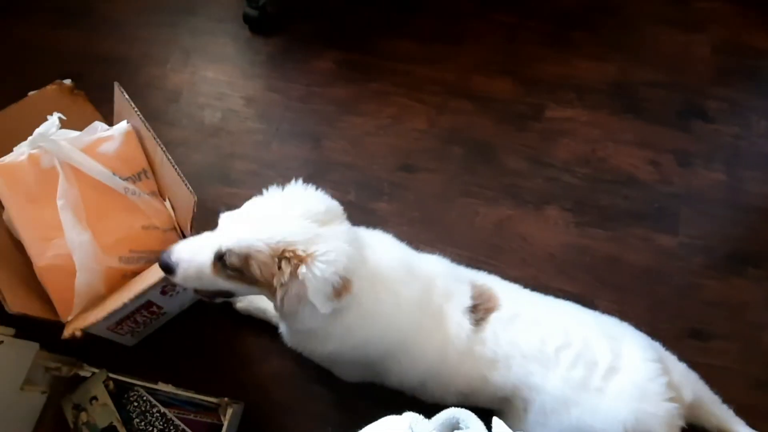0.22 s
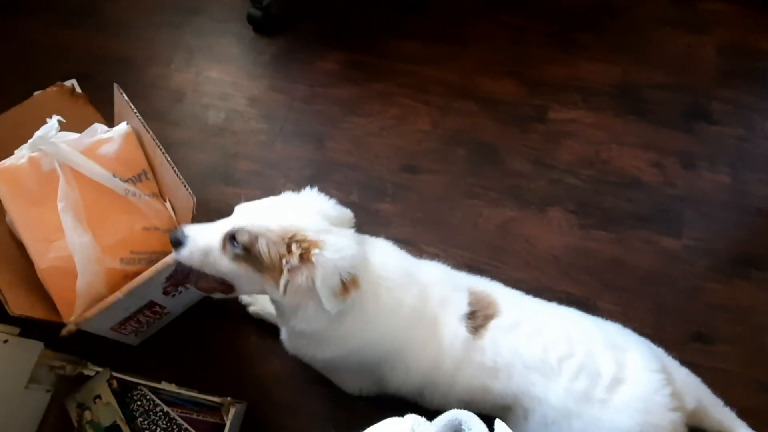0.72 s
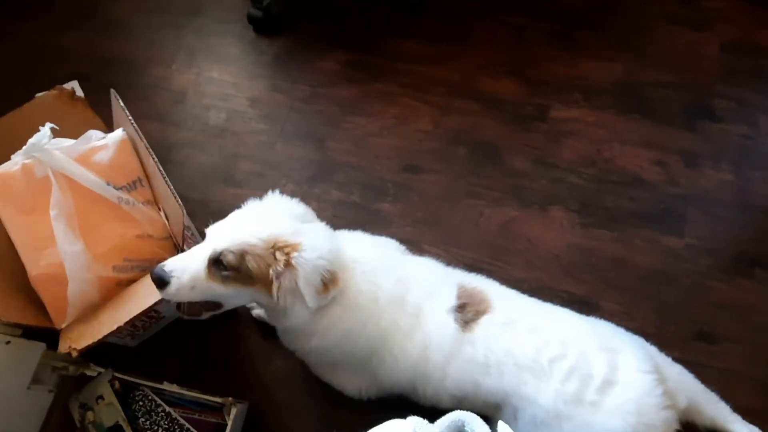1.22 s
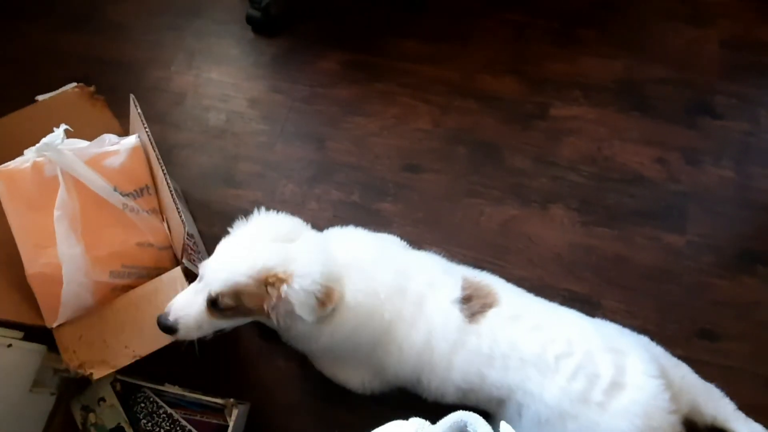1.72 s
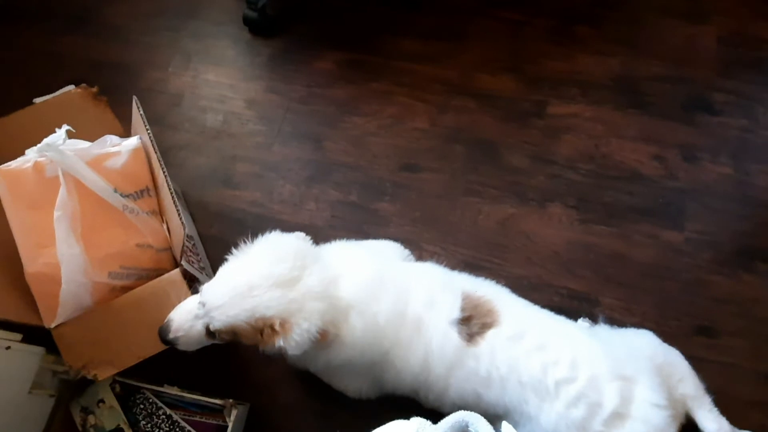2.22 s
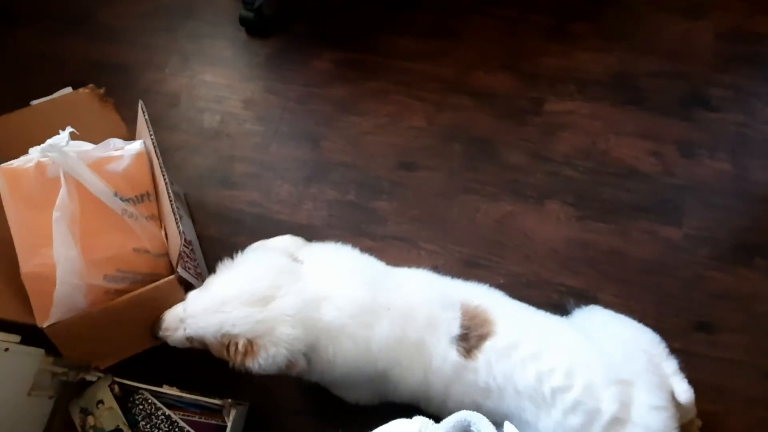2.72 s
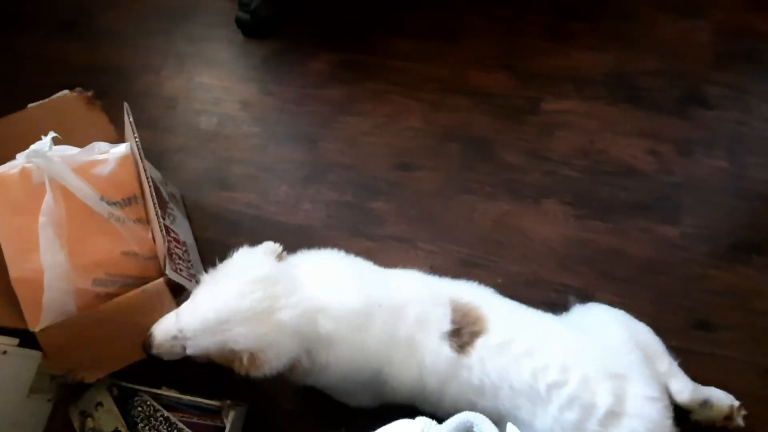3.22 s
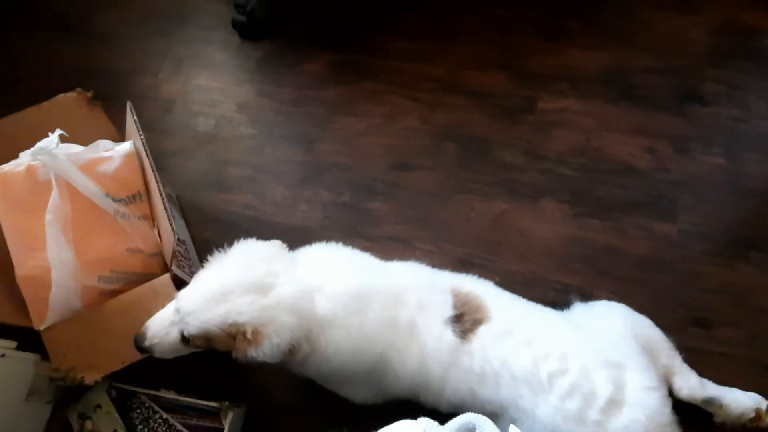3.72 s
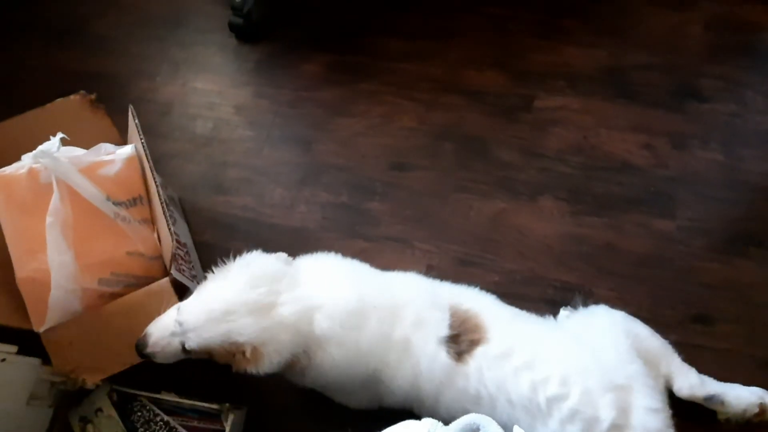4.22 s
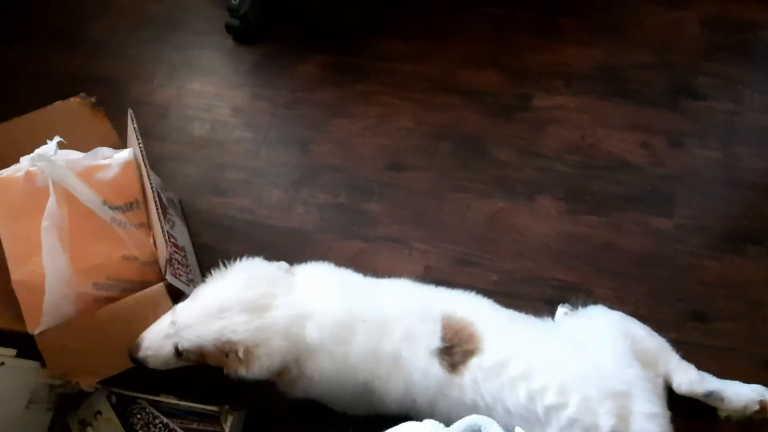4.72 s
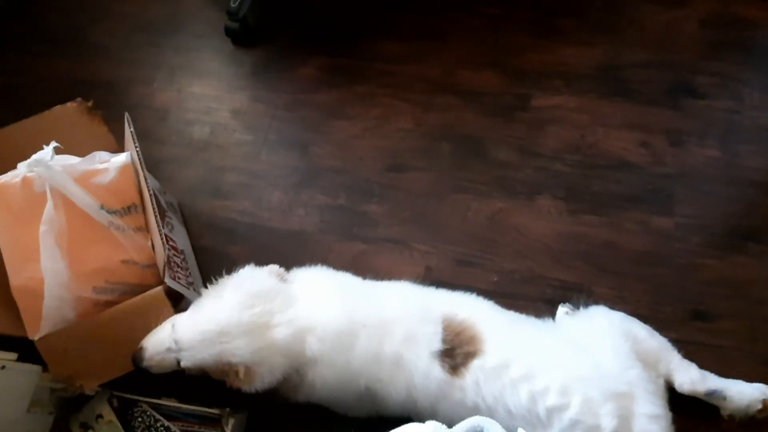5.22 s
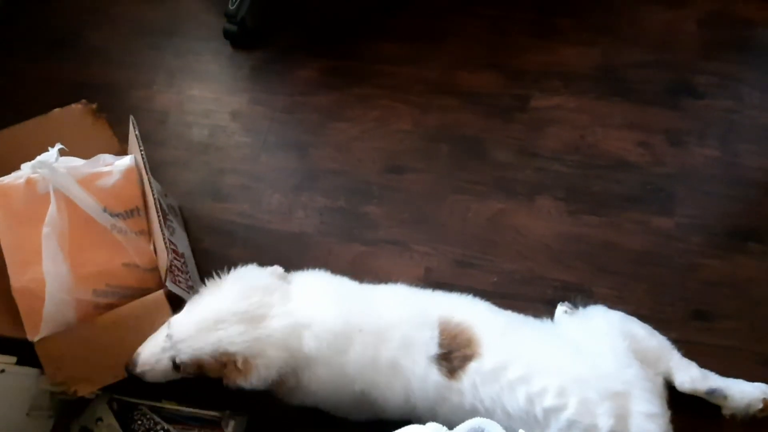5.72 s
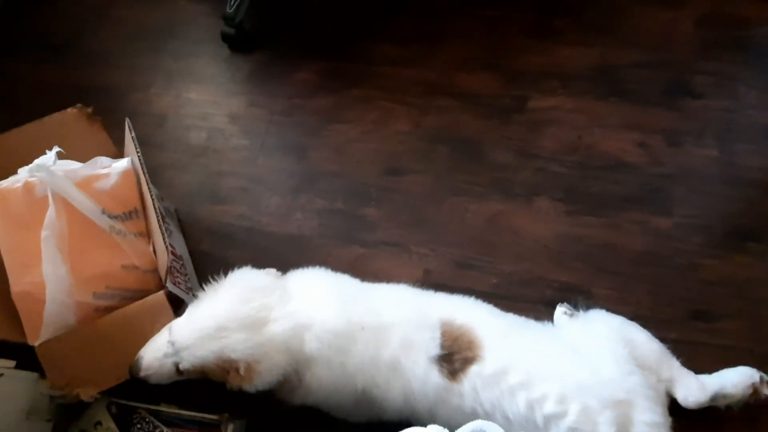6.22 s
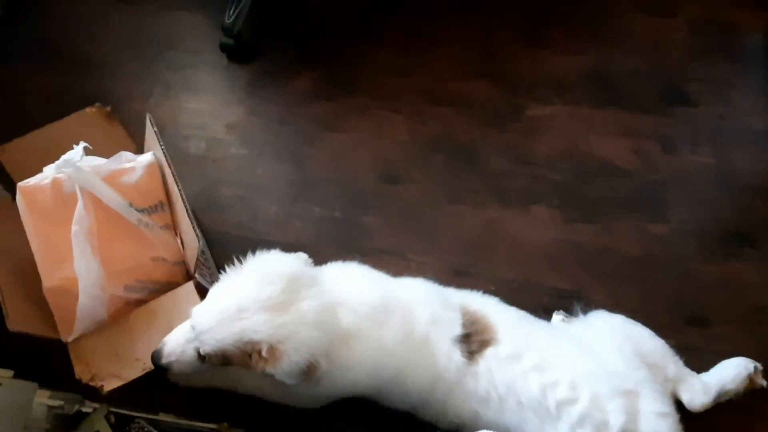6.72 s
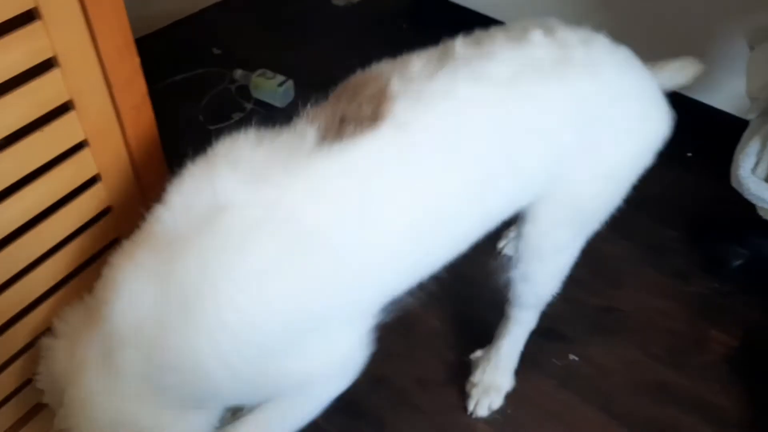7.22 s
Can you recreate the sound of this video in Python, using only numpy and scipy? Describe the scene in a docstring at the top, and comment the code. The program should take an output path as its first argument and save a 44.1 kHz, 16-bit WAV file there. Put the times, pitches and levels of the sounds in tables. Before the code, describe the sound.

In a small room with a faint hiss, a cardboard box scrapes, knocks and bumps on a wooden floor as a puppy tugs at it, a little left of the microphone. Paper crinkles with each pull, and crisp snaps of bitten cardboard grow stronger after the first few seconds. Following a short dropout near the end, a soft, duller rustle and a final scuff come from slightly to the right.

```python
"""A puppy chews and tugs at the flap of a cardboard box on a wooden floor, a little to the left.
The flap scrapes through its teeth and a paper bag rustles inside: streams of tiny fibre clicks.
Jerks ring the panels and make the box boom, bites snap the board, and the box thuds on the floor,
all in a small room with a faint hiss. Near the end the sound drops out for a moment, then resumes
quieter, duller and a little to the right, with one last scuff."""
import sys
import numpy as np
from scipy import signal
from scipy.fft import rfft, irfft
from scipy.io import wavfile

SR = 44100
rng = np.random.default_rng(int(sys.argv[2]) if len(sys.argv) > 2 else 0)


def generate_wav(signal):
    """Clip the signal to [-1, 1] and save it as 16-bit WAV at the path in sys.argv[1]."""
    frames = np.transpose(np.atleast_2d(signal))
    scaled = np.clip(frames, -1, 1) * 32767
    pcm = np.round(scaled).astype(np.int16)
    wavfile.write(sys.argv[1], SR, pcm)


N = 329427
TIME = np.arange(N) / SR

# the brief dropout near the end: t/s, gain/dB
PAUSE = [(6.868, 0), (6.878, -46), (6.98, -49), (7.03, 0)]
PAUSE_START_S = PAUSE[1][0]


def amp(db):
    """Decibels to gain."""
    return 10 ** (np.asarray(db) / 20)


def unit_rms(x):
    """Scale to rms 1."""
    return x / np.sqrt(np.mean(x ** 2) + 1e-20)


def unit_energy(x):
    """Scale each channel to energy 1."""
    return x / np.sqrt(np.sum(x ** 2, axis=-1, keepdims=True) + 1e-20)


def automation(points):
    """A (time, value) curve at every sample."""
    return np.interp(TIME, *np.transpose(points))


def add(track, s, sound):
    """Mix a sound into a track at time s."""
    at = max(round(s * SR), 0)
    track[at:at + len(sound)] += sound[:N - at]


def cut(x, hz, kind):
    """Butterworth filter."""
    return signal.sosfilt(signal.butter(2, hz, kind, fs=SR, output="sos"), x)


def resonance(x, hz, q):
    """One resonant band of x."""
    return signal.lfilter(*signal.iirpeak(hz, q, fs=SR), x)


def colour(x, spectrum, size=4096):
    """Minimum-phase EQ that follows a (Hz, dB) curve."""
    hz, db = np.transpose(spectrum)
    grid = np.maximum(np.fft.rfftfreq(size, 1 / SR), 1)
    gain = amp(np.interp(np.log(grid), np.log(hz), db))
    cepstrum = irfft(np.log(gain))
    cepstrum[1:size // 2] *= 2
    cepstrum[size // 2 + 1:] = 0
    return signal.fftconvolve(x, irfft(np.exp(rfft(cepstrum))))[:len(x)]


def tug_envelope(length_s, attack_share=0.17, swell_db=3.5, release_s=0.0094, size=32768):
    """A tug builds up, keeps swelling as the pull tightens, then lets go."""
    t = np.arange(size) / SR
    progress = np.minimum(t / length_s, 1)
    attack = np.minimum(progress / attack_share, 1)
    release = np.exp(-np.maximum(t - length_s, 0) / release_s)
    return attack * amp(swell_db * (progress - 1)) * release


def pulling():
    """How hard bag, flap and box are worked: tugs over a faint stirring that calms after the pause."""
    # tugs on the flap: t/s, length/s, paper level/dB, scrape level/dB, rumble level/dB
    tugs = [(-0.01, 0.047, -70, -66, -61.5), (0.159, 0.19, -54, -61.5, -53.5),
            (0.428, 0.069, -55.5, -60, -46), (0.627, 0.057, -64, -69.5, -55.5),
            (0.686, 0.11, -57.5, -70, -74), (1.032, 0.18, -63.5, -70, -59),
            (1.206, 0.15, -60.5, -65, -65.5), (1.414, 0.07, -59, -52, -49), (1.507, 0.12, -70, -71.5, -58),
            (1.839, 0.029, -54, -62.5, -67), (1.908, 0.027, -50.5, -69, -73),
            (2.003, 0.035, -39.5, -51, -45), (2.117, 0.53, -62.5, -70.5, -98), (2.579, .12, -52, -61, -68),
            (2.885, 0.073, -53, -59.5, -55.5), (2.954, 0.14, -49.5, -60.5, -79),
            (3.109, 0.18, -58.5, -63, -74), (3.296, 0.22, -58, -67, -65), (3.51, 0.22, -59.5, -64.5, -61.5),
            (3.85, 0.027, -48, -44, -49), (3.91, 0.16, -45.5, -55, -54), (4.351, .11, -60.5, -58.5, -63),
            (4.48, 0.086, -71, -76.5, -62), (4.66, 0.39, -56, -65, -55), (4.862, 0.057, -47.5, -55, -69),
            (4.981, 0.041, -46.5, -55, -54), (5.068, 0.056, -67, -70, -61), (5.317, 0.025, -92, -67.5, -62),
            (5.423, 0.028, -59.5, -57, -51), (5.517, 0.12, -54.5, -54, -49), (5.71, 0.033, -55.5, -66, -82),
            (6.222, 0.082, -56.5, -59.5, -58), (6.313, 0.12, -51.5, -59, -56.5),
            (6.464, 0.24, -51.5, -59.5, -54), (6.716, 0.05, -65.5, -68.5, -60.5),
            (6.79, 0.015, -59, -62.5, -53.5), (7.22, 0.019, -63, -81, -83.5),
            (7.429, 0.028, -37.5, -46, -59.5)]
    calm_db = -16.5 * (TIME > PAUSE_START_S)
    stirring = [amp(db + calm_db) for db in (-69.5, -79.5, -72.5)]   # paper, scrape, rumble
    tugged = np.zeros((3, N))
    for s, length_s, *levels_db in tugs:
        for track, db in zip(tugged, levels_db):
            add(track, s, amp(db) * tug_envelope(length_s))
    return np.hypot(stirring, tugged)


def grains(per_s, spread_db, clump_db, clump_hz):
    """Fibres catching and letting go: clicks of uneven size that come in clumps; rms 1."""
    sizes = amp(spread_db * np.minimum(rng.exponential(1, N), 4)) * rng.choice([-1, 1], N)
    clicks = sizes * (rng.random(N) < per_s / SR)
    clumps = np.interp(TIME * clump_hz, np.arange(N), rng.standard_normal(N))
    return unit_rms(clicks * amp(clump_db * clumps))


def box_rumble():
    """The shifting box catches and slips with a low, grainy rumble."""
    # hollow body of the box: f/Hz, level/dB
    rumble_colour = [(25, -44.5), (45, -16.5), (75, -19.5), (140, -6.5), (210, -8), (290, 0), (450, -8),
                     (620, -14.5), (1200, -26)]
    slips = grains(per_s=620, spread_db=3.5, clump_db=3.5, clump_hz=40.15)
    return unit_rms(colour(slips, rumble_colour))


def flap(x):
    """The stiff flap colours whatever excites it with a few narrow resonances."""
    # flap resonances: f/Hz, width/Hz, gain/dB
    flap_peaks = [(730, 80, -0.5), (1038, 83, 5), (1230, 15, 1.5), (1790, 340, 3.5), (2522, 71, 6.5)]
    return x + sum((amp(db) - 1) * resonance(x, hz, hz / width) for hz, width, db in flap_peaks)


def flap_scrape(patch_gain=1.3, bands=7):
    """Teeth rasp along the flap; a resonance wanders with the patch that they scrape."""
    # tone of teeth on cardboard: f/Hz, level/dB
    scrape_colour = [(350, -15), (700, -0.5), (1050, 2), (1500, -0.5), (2500, -5), (3600, -3), (6000, -26)]
    # resonance of the scraped patch: t/s, f/Hz
    scrape_pitch = [(0.7, 1080), (1.25, 1300), (1.45, 1050), (1.8, 1100), (2.25, 2600), (2.64, 1080),
                    (3.2, 2050), (3.5, 1080), (4.38, 2500), (4.6, 1450), (5.35, 2600), (5.6, 1100),
                    (6.7, 1080)]
    fibres = grains(per_s=3400, spread_db=4.5, clump_db=4.0, clump_hz=60.2)
    rasp = flap(colour(fibres, scrape_colour))
    centres_hz = np.geomspace(1050, 2650, bands)
    place = np.interp(automation(scrape_pitch), centres_hz, np.arange(bands))
    patch = np.zeros(N)
    for k, hz in enumerate(centres_hz):
        crossfade = np.clip(1 - abs(place - k), 0, 1)
        patch += crossfade * resonance(rasp, hz, q=5)
    return unit_rms(rasp + patch_gain * patch)


def paper_rustle():
    """The bag slides smoothly, with a few separate crackles on top."""
    # bright tone of thin paper: f/Hz, level/dB
    paper_colour = [(2000, -17), (4000, -8), (6500, -6), (8000, 1.5), (12500, -3.5), (15500, 2.5)]
    slide = grains(per_s=7000, spread_db=3.0, clump_db=1.2, clump_hz=90)
    crackles = grains(per_s=120, spread_db=3.0, clump_db=1.5, clump_hz=30)
    return unit_rms(colour(slide + .45 * crackles, paper_colour))


def rubbing(rumble_db, scrape_db, paper_db):
    """With each tug the box shifts, the flap drags through the teeth and the bag rustles."""
    paper_drive, scrape_drive, rumble_drive = pulling()
    rumble = amp(rumble_db) * rumble_drive * box_rumble()
    scrape = amp(scrape_db) * scrape_drive * flap_scrape()
    paper = amp(paper_db) * paper_drive * paper_rustle()
    return rumble + scrape + paper


def room_hiss(level_db):
    """Faint, steady room tone, heard until the pause."""
    # tone of the quiet room: f/Hz, level/dB
    hiss_colour = [(30, 1), (100, 19.5), (300, -2.5), (700, 0), (2500, 13), (5000, -10), (15500, -25)]
    air = np.array([unit_rms(colour(white, hiss_colour)) for white in rng.standard_normal((2, N))])
    return amp(level_db) * air * (TIME < PAUSE_START_S)


def even_burst(decay_s, size=4096):
    """A run of small slips that swells at once, dies away, and holds all pitches about evenly."""
    t = np.arange(size) / SR
    envelope = np.exp(-t / decay_s) * (1 - np.exp(-4 * t / decay_s))
    burst = rng.standard_normal(size) * envelope
    for _ in range(2):
        whitened = irfft(np.exp(1j * np.angle(rfft(burst))))
        burst = whitened * envelope ** .45
    return unit_energy(burst)


def ring(force, hz, t60):
    """One mode: each click of the force sets off a dying sine."""
    radius = np.exp(-np.log(1000) / (t60 * SR))
    angle = 2 * np.pi * hz / SR
    return signal.lfilter([0, np.sin(angle)], [1, -2 * radius * np.cos(angle), radius ** 2], force + 1e-18)


def struck(force, modes, spot_hz, spot_octaves):
    """The spot that is struck favours the modes near its own pitch."""
    out = np.zeros(len(force))
    for hz, db, t60 in modes:
        detuning = np.log2(hz / spot_hz) / spot_octaves
        out += amp(db) / (1 + detuning ** 2) * ring(force, hz, t60)
    return out


def boom(force, hz):
    """The whole box rings low, favouring the modes near hz; energy 1."""
    # modes of the box against the floor: f/Hz, level/dB, t60/s
    boom_modes = [(80, -6, .08), (112, -8, .06), (141, 2, .09), (176, -3, .06)]
    body = struck(force, boom_modes, hz, spot_octaves=.25)
    return unit_energy(cut(body, [hz / 2, 230], "band"))


def knocks(panel_db, boom_db, boom_lag_s):
    """A short jerk rings the panels; the whole box booms a moment later."""
    # jerks on the box: t/s, level/dB, favoured f/Hz, decay/s
    jerks = [(0.226, -44, 275, 0.015), (0.272, -43, 266, 0.0097), (0.435, -29, 294, 0.0036),
             (1.041, -29, 434, 0.007), (1.067, -34.5, 420, 0.0024), (1.443, -35, 273, .019),
             (1.588, -44, 282, 0.016), (2.014, -35.5, 277, 0.0091), (2.905, -43.5, 267, .026),
             (3.075, -38, 254, 0.021), (3.626, -42.5, 364, 0.0062), (3.798, -28, 400, 0.011),
             (3.883, -25, 304, 0.0053), (4.002, -26, 329, 0.0071), (4.243, -35.5, 275, 0.0071),
             (4.383, -38, 312, 0.0092), (4.452, -41, 333, .004), (4.621, -34.5, 342, 0.012),
             (4.791, -28.5, 393, 0.018), (5.056, -33.5, 297.3, 0.0047), (5.206, -49.5, 246, 0.0079),
             (5.438, -35.5, 280, 0.0086), (5.616, -33.5, 340, 0.0032), (5.756, -42.5, 353, 0.0061),
             (5.902, -26, 332, 0.0076), (6.019, -23.5, 330, 0.0085), (6.336, -40, 290, 0.015),
             (6.372, -42, 264, 0.016), (6.8, -40, 281, 0.0098)]
    # modes of the cardboard panels: f/Hz, level/dB, t60/s
    panel_modes = [(248.3, -22.5, .06), (287.4, -4, 0.076), (296, -1, 0.063), (374.5, 4.5, 0.055),
                   (440, -1.5, 0.027), (445.5, -0.5, 0.096), (450.5, -0.5, 0.24)]
    middling_db, boom_follows = -36.5, .65   # the boom grows less than the knock does
    out = np.zeros(N)
    for s, knock_db, spot_hz, decay_s in jerks:
        force = even_burst(decay_s, size=12000)
        panel = cut(struck(force, panel_modes, spot_hz, spot_octaves=0.19), [220, 600], "band")
        shake_db = boom_follows * (knock_db - middling_db)
        add(out, s, amp(panel_db + knock_db) * unit_energy(panel))
        add(out, s + boom_lag_s, amp(boom_db + shake_db) * boom(force, hz=180))
    return out


def snaps(level_db, crumple_db, crumple_s, size=4096):
    """A bitten crease gives way in a burst of fibre breaks, mixed with a thinner crumple."""
    # bites: t/s, level/dB, then relative to that level: hollow/dB, treble/dB, top/dB
    bites = [(0.272, -61, 4, 6.5, 14), (0.438, -57, 7.5, 7.5, 3.5), (0.704, -82, 13, 11, 22),
             (1.037, -64, -1.5, 0, 3), (1.062, -60.5, 0, 0, 1), (1.297, -75.5, 9, 15.5, 20),
             (1.433, -71, 25, -2, -9), (1.99, -68.5, -7, 2, 11), (2.012, -48.5, -3, -1.5, 7),
             (2.851, -81.5, -12, 11, 13), (2.911, -41.5, -6.5, -4, -6.5), (3.641, -61.5, -22, 5, 11),
             (3.771, -62.5, -12, 0, 5), (3.799, -29.5, -6, -4, -1), (3.879, -34, 1, -2, -3),
             (4.002, -27, -4, -8.5, -3), (4.24, -60, -4.5, -2, -1), (4.306, -64, -11, 0.5, 3),
             (4.359, -65, -12, 3.5, 7), (4.384, -50.5, -6.5, -25, -11), (4.413, -64, 3, 0.5, 6.5),
             (4.623, -63.5, 0.5, 0, 2.5), (4.792, -33.5, -3, -6, -6), (4.87, -53, -1.5, -3, -1),
             (4.936, -52.5, -3.5, -0.5, 2.5), (5.051, -46, 1.5, 1, 3), (5.114, -71, -3, 4, 15),
             (5.41, -71, -7, 7.5, 8), (5.754, -55, 2, -1, 1.5), (5.898, -39.5, 2, 3.5, 2),
             (6.018, -30, -2, -2, -3)]
    # tone of snapping cardboard: f/Hz, level/dB
    snap_colour = [(300, -27), (600, 1.5), (850, 4), (1200, 8), (1600, -0.5), (2600, -2), (3300, -1.5),
                   (4500, -3), (6400, -3.5), (8000, 1.5), (12000, -3), (15500, -0.5)]
    give_s, middling_db, doubling_db = 0.0024, -51.5, 50   # harder bites take longer to give way
    out, t = np.zeros(N), np.arange(size) / SR
    for s, bite_db, hollow_db, treble_db, top_db in bites:
        burst = even_burst(give_s * 2 ** ((bite_db - middling_db) / doubling_db))
        crumple = unit_energy(rng.standard_normal(size) ** 3 * np.exp(-t / crumple_s))
        tone = [(1250, hollow_db), (1600, 0), (3300, 0),
                (4300, treble_db), (8000, treble_db), (11000, top_db)]
        add(out, s, amp(level_db + bite_db) * colour(burst + amp(crumple_db) * crumple, tone))
    return flap(colour(out, snap_colour))


def floor_bumps(level_db):
    """The box drops back on the floorboards and judders with a deep thud."""
    # landings: t/s, level/dB, favoured f/Hz
    landings = [(0.442, -36, 140), (1.044, -42, 130), (1.474, -42, 162), (2.018, -42.5, 186),
                (3.082, -37.5, 91.7), (3.629, -47, 141), (4.625, -42.5, 138), (5.622, -48, 138),
                (6.805, -41.5, 87.5)]
    out = np.zeros(N)
    for s, bump_db, hz in landings:
        judder = even_burst(decay_s=.009, size=12000)
        add(out, s, amp(level_db + bump_db) * boom(judder, hz))
    return out


def room_tail(wet_db, bass_wet_db, build_s, t60_s=0.21, treble_t60_s=0.22, size=16384):
    """The room's answer to a click: nearly the same on both sides in the bass, diffuse above."""
    t = np.arange(size) / SR
    noise = rng.standard_normal((2, size))
    build = 1 - np.exp(-t / build_s)
    decay, treble_decay = [build * np.exp(-np.log(1000) * t / t60) for t60 in (t60_s, treble_t60_s)]
    diffuse = unit_energy(cut(noise, 8600, "low") * decay - cut(noise, 4500, "high") * treble_decay)
    shared = unit_energy((rng.standard_normal(size) + 0.3 * noise) * decay)
    return amp(wet_db) * cut(diffuse, 560, "high") + amp(bass_wet_db) * cut(shared, 710, "low")


def room(x, right_db, right_lag_s=.00036, poses=3, poses_per_s=5):
    """Direct sound reaches the left side first; the echoes change as head and flap move."""
    # the microphone's housing colours the right side above the bass: f/Hz, gain/dB
    shading = [(300, 0.016), (520, right_db + 0.5), (1000, right_db - 3.5), (2000, right_db + 1),
               (4000, right_db - 11), (8000, right_db + 4.5), (15000, right_db - 0.5)]
    right = colour(np.roll(x, round(right_lag_s * SR)), shading)
    out = np.array([x, right])
    for k in range(poses):
        cycle = (TIME * poses_per_s + k) % poses
        crossfade = np.sqrt(np.clip(1 - abs(cycle - 1), 0, 1))
        tail = room_tail(wet_db=-2.5, bass_wet_db=-4.5, build_s=0.00052)
        out += signal.oaconvolve((x * crossfade)[None], tail, axes=1)[:, :N]
    return out


def scene():
    """All the box's sounds in the room; after the pause they lean a little to the right."""
    board = snaps(level_db=38.5, crumple_db=-3.5, crumple_s=0.0019)
    box = knocks(panel_db=20.5, boom_db=-29.5, boom_lag_s=0.0048) + floor_bumps(level_db=24.0)
    friction = rubbing(rumble_db=-1.5, scrape_db=1.5, paper_db=3.0)
    pan = amp(np.array([[-3], [3]]) * (TIME > PAUSE_START_S))
    return room(board + box + friction, right_db=-2.5) * pan + room_hiss(level_db=-76)


def record(dry, cutoff_hz=15700):
    """Microphone colour, the pause with a duller tone after it, and a steep top cut."""
    # the microphone's dip in the treble: f/Hz, gain/dB
    microphone = [(7000, 2), (8300, -14), (9400, -17), (10400, -11.5), (11800, -2)]
    heard = np.array([colour(channel, microphone) for channel in dry]) * amp(automation(PAUSE))
    heard = np.where(TIME > PAUSE_START_S, cut(heard, 6800, "low"), heard)
    return signal.sosfilt(signal.ellip(10, .2, 80, cutoff_hz, fs=SR, output="sos"), heard)


dry = scene()
out = record(dry)
generate_wav(out)
```